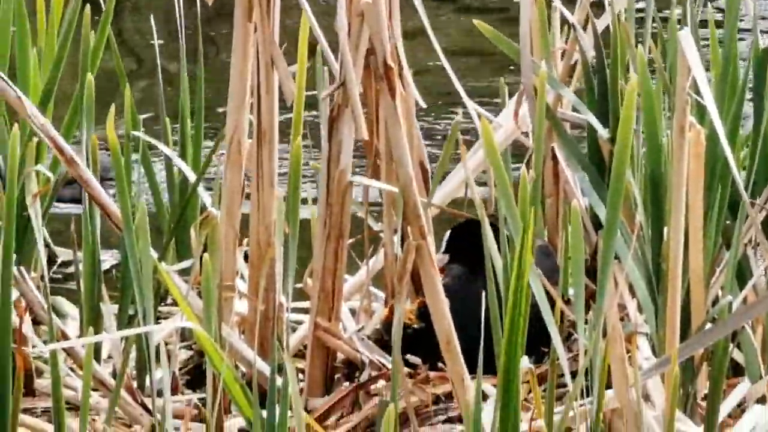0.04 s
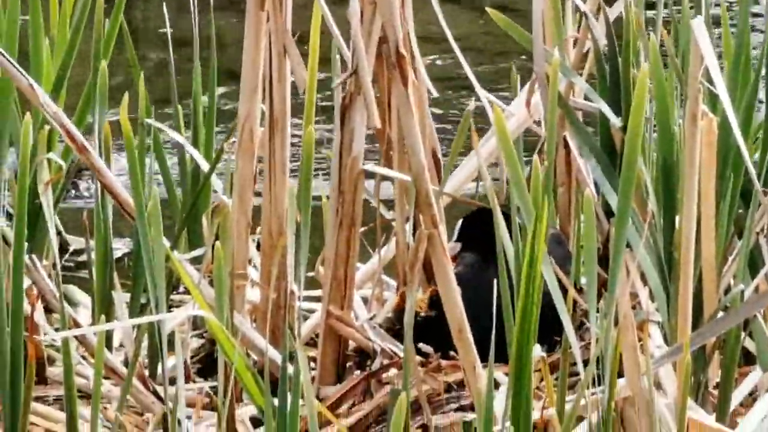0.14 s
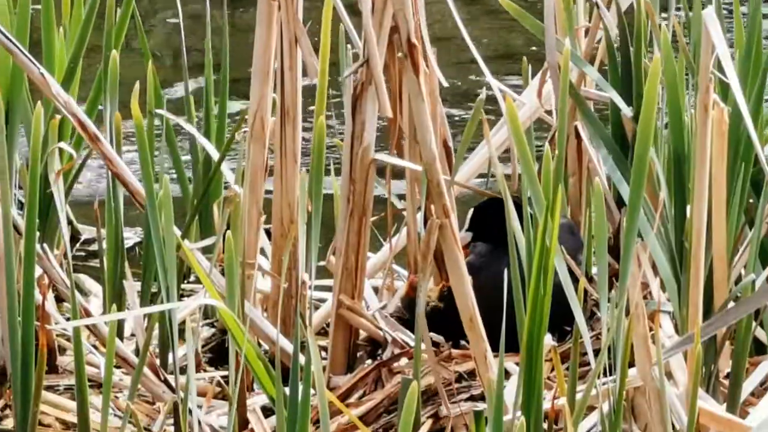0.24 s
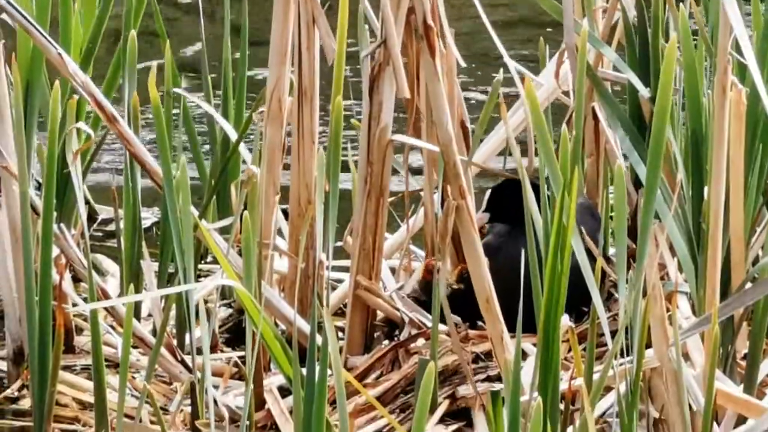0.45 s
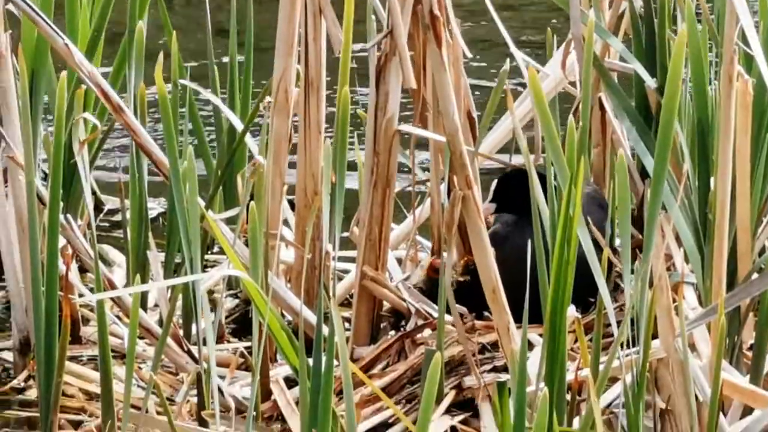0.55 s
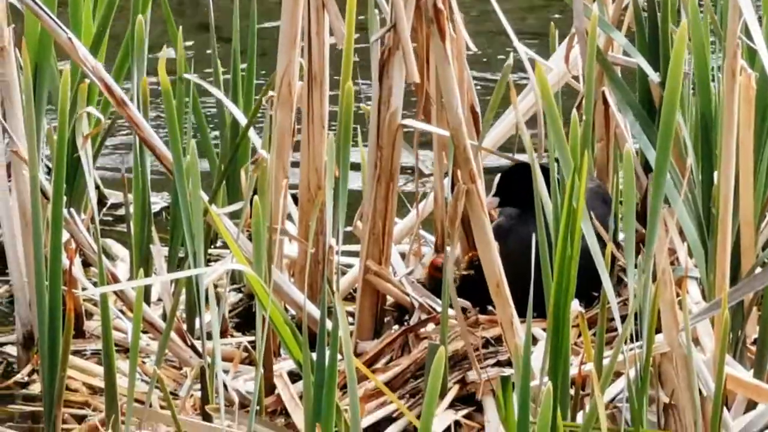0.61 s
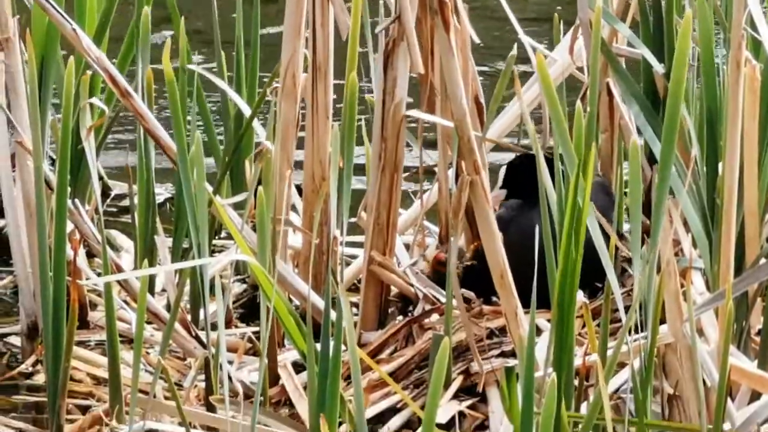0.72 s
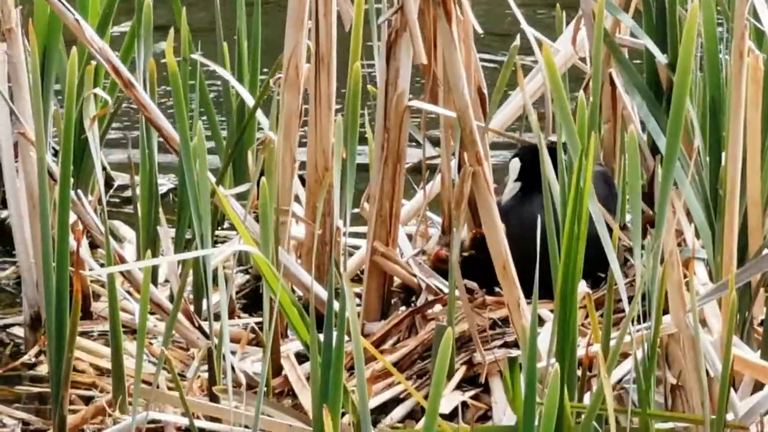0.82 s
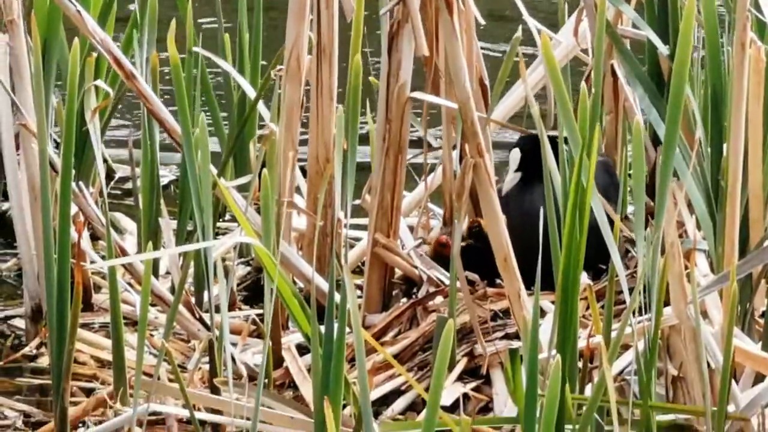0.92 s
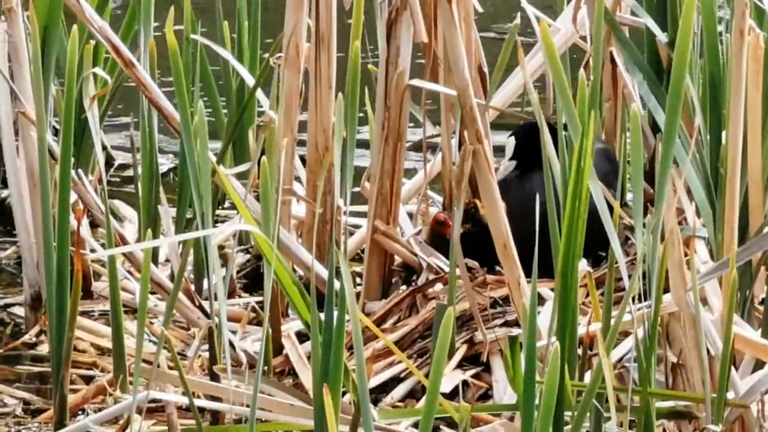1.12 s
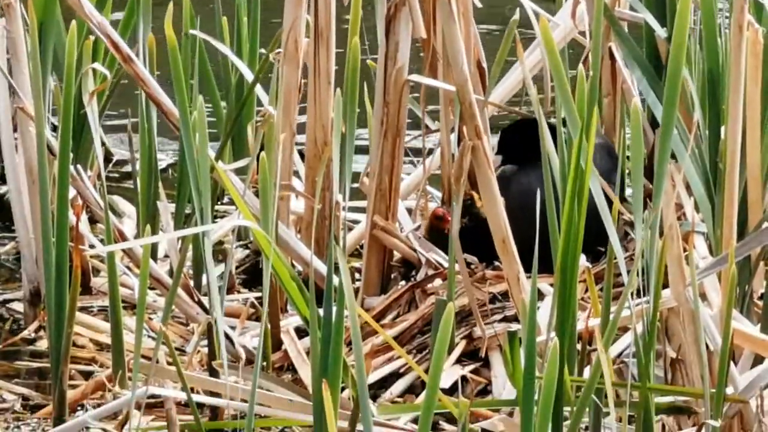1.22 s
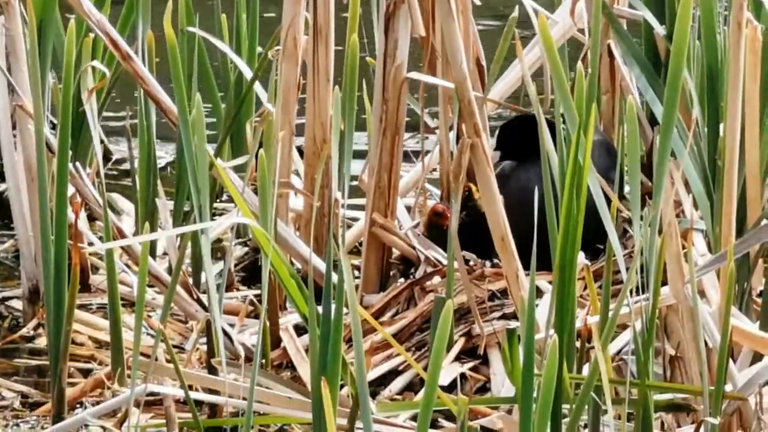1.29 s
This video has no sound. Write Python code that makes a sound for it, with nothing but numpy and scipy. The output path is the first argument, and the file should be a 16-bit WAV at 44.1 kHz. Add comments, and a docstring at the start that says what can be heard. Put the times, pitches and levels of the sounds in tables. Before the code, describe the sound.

A loud, dry crack of the recording device's own casing, on the right, after a second of low wind buffeting, soft puffs, faint bird whistles and a chick's peep, outdoors by a reedy pond.

```python
"""Wind buffets each port of a phone at a reed bed by a pond: lumpy low noise plus single pressure puffs.
Birds whistle as bending near-sines, a chick peeps as a harmonic stack, both with scattered echoes.
The case creaks and snaps by the right port: slips ring short decaying modes; a limiter then ducks the scene.
Rustles are short high-passed noise; the outdoor hush is shaped noise."""
import sys
import numpy as np
from scipy import signal
from scipy.fft import rfft, irfft
from scipy.io import wavfile
from scipy.ndimage import uniform_filter1d

SR = 44100
rng = np.random.default_rng(int(sys.argv[2]) if len(sys.argv) > 2 else 0)


def linear_from_db(decibels):
    """Turn decibels (scalar or array-like) into linear amplitude factors; 0 gives 1."""
    return 10 ** (np.asarray(decibels, float) / 20)


def int16_out(signal):
    """Quantize to a 16-bit WAV file."""
    q = np.round(np.clip(np.atleast_2d(signal).T, -1, 1) * 32767)
    wavfile.write(sys.argv[1], SR, q.astype(np.int16))


N = 59535

# wind rumble level: time_s, left_db, right_db
WIND_LEVELS = [(0, -47, -57), (.1, -46.5, -42), (.27, -49, -46.5), (.33, -43.5, -45), (.62, -38, -40),
               (.75, -40.5, -37), (0.879, -46.5, -42), (.95, -27.5, -57), (1.031, -45.5, -53),
               (1.2, -45, -44)]
# wind spectrum, relative: freq_hz, density_db
WIND_SPECTRUM = [(10, -12), (25, 0.5), (76, -2), (170, -21), (350, -48), (700, -82.5)]
WIND_LUMPS_RMS_DB, WIND_LUMPS_HZ = 2.5, 12
# single puffs, level before rebound: time_s, level_db, width_s, port (0 left, 1 right)
WIND_PUFFS = [(0.2154, -20, 0.0049, 1), (.299, -25.5, 0.0045, 1), (0.4318, -17.5, 0.0043, 1),
              (0.6077, -23, 0.0018, 0)]
PUFF_RISE_SHARE, PUFF_REBOUND_SHARE = 0.56, 0.17

# slips of the case, mode gains come on top: time_s, tick_db, body_db, push_db
CASE_SNAPS = [(1.0170, -25.5, -36, -51), (1.034, -24, -48, -56.5), (1.0370, -16, -32, -56),
              (1.0437, -11, -25.5, -48.5), (1.0493, -16.5, -32, -44), (1.0536, -31.5, -23, -42.5),
              (1.0539, -6.5, -24, -5.5), (1.0552, -8.5, 4, -13), (1.1073, -48, -32.5, -26)]
# bright modes of the case: freq_hz, level_db, t60_s
TICK_RESONANCES = [(5600, -3, .0018), (10930, 0.5, 0.0026), (12220, -1.5, 0.0023), (15050, 2.5, 0.002)]
# body modes of the case: freq_hz, level_db, t60_s
BODY_RESONANCES = [(2130, -3.5, 0.0063), (3020, 5, 0.0034), (3910, -7.5, 0.0036)]
# extra modes at the left port: freq_hz, level_db, t60_s
LEFT_RESONANCES = [(6500, 12.5, 0.0021), (9000, 0, 0.0045)]
PUSH_HZ, PUSH_T60_S, MODE_RISE_S = 640, 0.0081, 0.00008
LEFT_TICK_POWER, LEFT_TICK_DB = 2.9, -10.5  # the far port hears the hard ticks best
# base level of the creak's slips: time_s, level_db
CREAK_LEVELS = [(1.01, -69.5), (1.03, -68.5), (1.044, -48.5), (1.053, -35.5), (1.058, -70)]
CREAK_SLIPS_PER_S, CREAK_SPREAD_DB, CREAK_LEFT_DB = 5000, 1, -27.5

# clear whistles: start_s, length_s, start_hz, middle_hz, end_hz, level_db, left_minus_right_db
BIRD_WHISTLES = [(.285, 0.096, 3278, 3775, 3920, -68.5, 18), (.365, 0.18, 5625, 5600, 5550, -70, 0),
                 (.435, 0.083, 3250, 3730, 3950, -66, -4.5), (.605, 0.04, 4880, 4750, 5480, -67, -6),
                 (.68, .14, 8200, 8400, 7300, -78.5, -5), (.862, 0.034, 6550, 6130, 6020, -63, -12.5),
                 (.885, .035, 3611, 4650, 4600, -66.5, 1), (.895, 0.11, 5925, 6090, 6190, -61, -8),
                 (.93, .022, 4500, 5000, 5650, -62, 6), (.951, 0.027, 6102, 5000, 4700, -57.5, 5.5),
                 (1.155, .14, 6850, 6500, 6830, -68.5, -10), (1.268, 0.046, 4800, 4836, 4840, -63.5, 5)]
WHISTLE_HAZE_SHARE, WHISTLE_WAVER_SHARE, WHISTLE_HAZE_HZ = 0.21, 0.0033, 91
# hazy, broken chatter further off: start_s, length_s, start_hz, middle_hz, end_hz, level_db,
# left_minus_right_db
BIRD_CHATTER = [(.34, 0.14, 3940, 4050, 3810, -69, 5), (.515, 0.082, 6870, 7080, 6780, -71.5, -3),
                (.618, 0.0785, 3250, 3650, 3860, -68.5, -12), (.65, 0.076, 4544, 4550, 4940, -70, -6),
                (1.265, 0.079, 4350, 4400, 4340, -62.5, -2)]
CHATTER_HAZE_SHARE, CHATTER_WAVER_SHARE, CHATTER_HAZE_HZ = 0.95, 0.012, 380

# chick's peep: time_s, second_partial_hz, level_db
PEEP_ARCH = [(.715, 3232, -65.5), (.738, 3594, -63), (.762, 3692, -60), (0.796, 3292, -61.5),
             (0.843, 3180, -67.5)]
# peep partials, relative: multiple, level_db
PEEP_STACK = [(2, 0), (3, -16.5), (4, -26), (5, -25), (6, -31), (8, -21)]
PEEP_BRIGHT_S, PEEP_BRIGHT_WIDTH_S, PEEP_PAN_DB_PER_MULTIPLE = 0.76, 0.019, -3
ECHO_DB, ECHO_T60_S = -1.5, 0.25

# rustles in the reeds, level before the high-pass: time_s, length_s, level_db, low_edge_hz
REED_RUSTLES = [(0.144, 0.031, -60, 3350), (.52, 0.13, -73, 10500), (.906, 0.0077, -63.5, 8600),
                (1.339, .008, -61.5, 7500)]
RUSTLE_LEFT_MINUS_RIGHT_DB = -4

# hush spectrum, relative: freq_hz, density_db
HUSH_SPECTRUM = [(88, -27.5), (150, -9.5), (643, -8.5), (953, -19), (2050, -20.5), (4420, -31), (8790, -37),
                 (15300, -40), (16500, -57)]
# hush balance: freq_hz, left_minus_right_db
HUSH_BALANCE = [(300, -3), (5000, -5.5), (12000, -5)]
HUSH_DB, HUSH_PATCH_DB, HUSH_SWELL_RMS_DB, HUSH_SWELL_HZ = -58, -0.5, -0.51, 3

LIMIT_DB, LIMIT_SHARE, LIMIT_RELEASE_DB_PER_S = -22.5, 0.54, 76
HOLD_DB, HOLD_SHARE, HOLD_RELEASE_DB_PER_S = -11, 0.5, 0  # never lets go
CEILING = 0.97


def evened(x):
    """Scales to unit rms."""
    return x / np.sqrt(np.mean(x ** 2) + 1e-20)


def read(points, hz):
    """Interpolates a table on a log-frequency axis."""
    point_hz, value = np.transpose(points)
    return np.interp(np.log(hz + 1), np.log(point_hz + 1), value)


def add(mix, start_s, sound):
    """Mixes a two-channel sound in at a time."""
    part = mix[:, round(start_s * SR):][:, :sound.shape[1]]
    part += sound[:, :part.shape[1]]


def slow(hz, size):
    """Unit-rms random drift, low-passed by a Gaussian at hz."""
    white = rng.standard_normal(size)
    count = white.shape[-1]
    lowpass = np.exp(-(np.fft.rfftfreq(count, 1 / SR) / hz) ** 2)
    return evened(irfft(rfft(white) * lowpass, count))


def pan(left_minus_right_db):
    """Left and right gains."""
    return linear_from_db(np.array([left_minus_right_db / 2, -left_minus_right_db / 2]))


def ring(modes):
    """Sum of exponentially dying modes with a soft start."""
    t = np.arange(600) / SR
    rise = 1 - np.exp(-t / MODE_RISE_S)
    return rise * sum(linear_from_db(db - 60 * t / t60_s) * np.sin(2 * np.pi * hz * t) for hz, db, t60_s in modes)


def noise(spectrum, size, balance=((1, 0),), patch_db=0.):
    """Two unrelated channels of random short-time spectra with drifting patches, unit rms overall."""
    hop, hz = size // 4, np.fft.rfftfreq(size, 1 / SR)
    a, b, c, d, patch = rng.standard_normal((N // hop + 5, len(hz), 5)).T
    patch = uniform_filter1d(patch, size=10, axis=0)
    patch = evened(uniform_filter1d(patch, size=10, axis=1))
    z = np.array([a + 1j * b, c + 1j * d]) * pan(read(balance, hz))[:, :, None]
    z = z * linear_from_db(read(spectrum, hz)[:, None] + patch_db * patch)
    return evened(signal.istft(z, nperseg=size, noverlap=size - hop)[1][:, :N])


def wind():
    """Turbulence at the ports: lumpy rumble, unrelated left and right, plus puffs that rebound."""
    t = np.arange(N) / SR
    time_s, left_db, right_db = np.transpose(WIND_LEVELS)
    level_db = np.array([np.interp(t, time_s, left_db), np.interp(t, time_s, right_db)])
    lumps_db = WIND_LUMPS_RMS_DB * slow(WIND_LUMPS_HZ, (2, N))
    out = noise(WIND_SPECTRUM, size=4096) * linear_from_db(level_db + lumps_db)
    for puff_s, db, width_s, port in WIND_PUFFS:
        u = (t - puff_s) / width_s
        push = np.exp(-(u / np.where(u < 0, PUFF_RISE_SHARE, 1)) ** 2)
        rebound = PUFF_REBOUND_SHARE * np.exp(-(u / 4.1) ** 2)
        out[round(port)] -= linear_from_db(db) * (push - rebound)
    return out


def snaps():
    """Slips ring the case: tick, body and low push at the right port, a thin tick at the left."""
    out = np.zeros((2, N))
    tick, body, left = ring(TICK_RESONANCES), ring(BODY_RESONANCES), ring(LEFT_RESONANCES)
    push = ring([(PUSH_HZ, 0, PUSH_T60_S)])
    for time_s, tick_db, body_db, push_db in CASE_SNAPS:
        right_snap = linear_from_db(tick_db) * tick + linear_from_db(body_db) * body + linear_from_db(push_db) * push
        left_snap = linear_from_db(LEFT_TICK_POWER * tick_db + LEFT_TICK_DB) * (left + tick)
        add(out, time_s, -np.array([left_snap, right_snap]))
    return out + creak(tick, left)


def creak(tick, left):
    """Stick-slip: dense random slips of either sign, each ringing the case modes."""
    time_s, db = np.transpose(CREAK_LEVELS)
    level = linear_from_db(np.interp(np.arange(N) / SR, time_s, db, -200, -200))
    slips = (rng.random(N) < CREAK_SLIPS_PER_S / SR) * rng.choice([-1, 1], N)
    slips = slips * linear_from_db(CREAK_SPREAD_DB * rng.exponential(1, N)) * level
    right_creak = signal.oaconvolve(slips, tick)[:N]
    left_creak = signal.oaconvolve(slips, linear_from_db(CREAK_LEFT_DB) * left)[:N]
    return np.array([left_creak, right_creak])


def notes(rows, waver_share, haze_share, haze_hz):
    """Bird notes: near-sines that bend along a parabola, waver, and blur by random beating."""
    out = np.zeros((2, N))
    for start_s, length_s, start_hz, middle_hz, end_hz, db, side_db in rows:
        n = round(length_s * SR)
        waver, left, right = slow(haze_hz, (3, 14000))[:, :n]
        bend = np.polyfit([0, .5, 1], [start_hz, middle_hz, end_hz], 2)
        hz = np.polyval(bend, np.arange(n) / n) * (1 + waver_share * waver)
        tone = np.sqrt(2) * np.sin(2 * np.pi * np.cumsum(hz) / SR) * signal.windows.tukey(n, .5)
        haze = 1 - haze_share + haze_share * np.array([left, right])
        add(out, start_s, pan(side_db)[:, None] * linear_from_db(db) * haze * tone)
    return out


def peep():
    """Chick: a thin harmonic stack whose upper partials open at the top of the arch."""
    time_s, hz, db = np.transpose(PEEP_ARCH)
    t = np.arange(time_s[0], time_s[-1], 1 / SR)
    turns = np.cumsum(np.interp(t, time_s, hz)) / SR / 2  # of the fundamental
    bright = np.exp(-((t - PEEP_BRIGHT_S) / PEEP_BRIGHT_WIDTH_S) ** 4)
    stack = 0
    for multiple, partial_db in PEEP_STACK:
        partial = linear_from_db(partial_db) * np.sin(2 * np.pi * round(multiple) * turns)
        if multiple > 3.5:
            partial = partial * bright
        stack = stack + pan(PEEP_PAN_DB_PER_MULTIPLE * multiple)[:, None] * partial
    envelope = linear_from_db(np.interp(t, time_s, db)) * signal.windows.tukey(len(t), .15)
    out = np.zeros((2, N))
    add(out, time_s[0], np.sqrt(2) * stack * envelope)
    return out


def outdoors(x):
    """Scattered echoes off water and banks: a decaying noise tail after a 4 ms gap."""
    t = np.arange(SR // 3) / SR
    tail = rng.standard_normal((len(t), 2)).T * linear_from_db(-60 * t / ECHO_T60_S) * (t > .004)
    tail = tail / np.linalg.norm(tail[0])
    return x + linear_from_db(ECHO_DB) * signal.fftconvolve(x.mean(0)[None], tail, axes=1)[:, :N]


def rustles():
    """Reeds: short puffs of high-passed noise, unrelated at the two ports."""
    out = np.zeros((2, N))
    for time_s, length_s, db, low_edge_hz in REED_RUSTLES:
        n = round(length_s * SR)
        highpass = signal.butter(2, low_edge_hz, "high", fs=SR, output="sos")
        puff = signal.sosfilt(highpass, rng.standard_normal((8000, 2)).T)[:, -n:]  # settled part
        gain = linear_from_db(db) * pan(RUSTLE_LEFT_MINUS_RIGHT_DB)[:, None]
        add(out, time_s, gain * puff * np.hanning(n) ** .5)
    return out


def hush():
    """Water, reeds and far traffic: a soft wash of shaped noise that swells slightly."""
    wash = noise(HUSH_SPECTRUM, size=1024, balance=HUSH_BALANCE, patch_db=HUSH_PATCH_DB)
    return wash * linear_from_db(HUSH_DB + HUSH_SWELL_RMS_DB * slow(HUSH_SWELL_HZ, N))


def scene():
    """Sums all sources at the two ports; only the birds get echoes."""
    whistles = notes(BIRD_WHISTLES, WHISTLE_WAVER_SHARE, WHISTLE_HAZE_SHARE, WHISTLE_HAZE_HZ)
    chatter = notes(BIRD_CHATTER, CHATTER_WAVER_SHARE, CHATTER_HAZE_SHARE, CHATTER_HAZE_HZ)
    birds = outdoors(whistles + chatter + peep())
    return wind() + snaps() + birds + rustles() + hush()


def duck(power, over_db, share, release_db_per_s):
    """Gain cut in dB: a share of the peak excess over a threshold, released at a steady rate."""
    fall_db = np.arange(N) * abs(release_db_per_s) / SR
    power_db = 10 * np.log10(abs(power) + 1e-12)
    peak_db = np.maximum.accumulate(power_db + fall_db, axis=-1) - fall_db
    return share * np.maximum(peak_db - over_db, 0)


def band_limit(x):
    """A steep low-pass at the top of the band."""
    return signal.sosfilt(signal.butter(12, 17270, fs=SR, output="sos"), x)


def record(dry):
    """A shared limiter and a per-port gain hold, both lagging the sound, then a soft ceiling."""
    power = uniform_filter1d(dry ** 2, size=44, axis=1)
    limit_db = duck(power.max(0), LIMIT_DB, LIMIT_SHARE, LIMIT_RELEASE_DB_PER_S)
    hold_db = duck(power, HOLD_DB, HOLD_SHARE, HOLD_RELEASE_DB_PER_S)
    cut_db = uniform_filter1d(limit_db + hold_db, size=60, axis=1)
    cut_db = np.pad(cut_db, ((0, 0), (70, 0)))[:, :N]  # lag in samples
    held = CEILING * np.tanh(dry / linear_from_db(cut_db) / CEILING)
    return band_limit(held)


dry = scene()
out = record(dry)
int16_out(out)
```